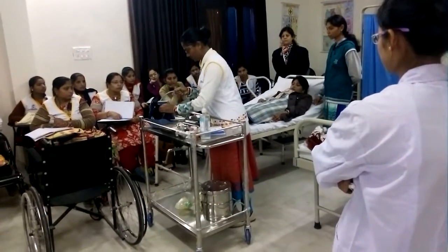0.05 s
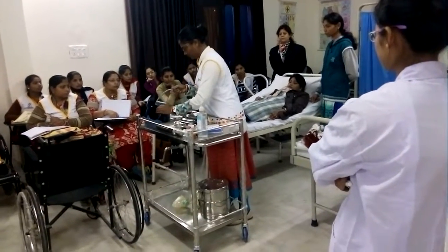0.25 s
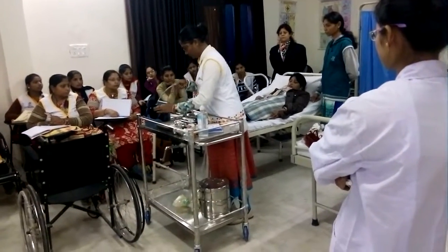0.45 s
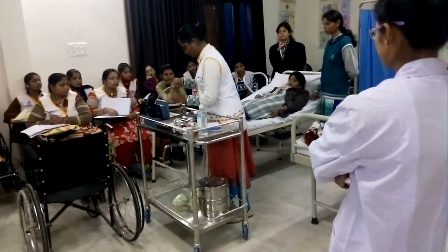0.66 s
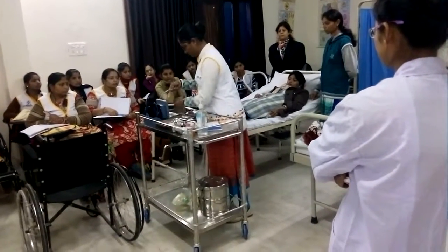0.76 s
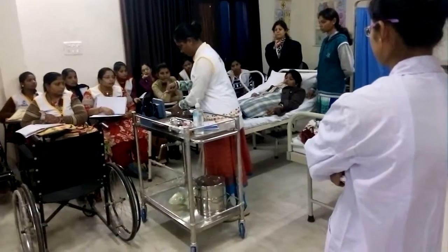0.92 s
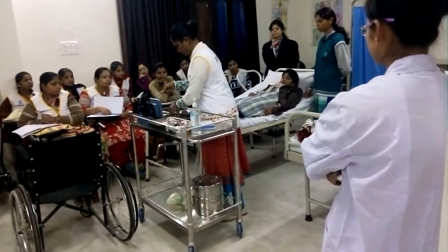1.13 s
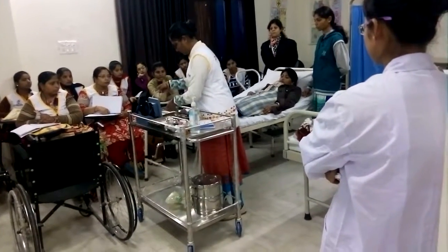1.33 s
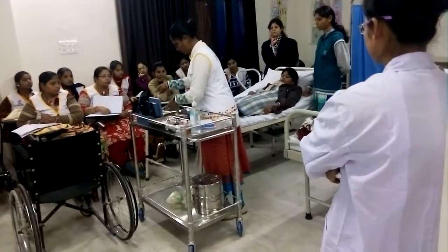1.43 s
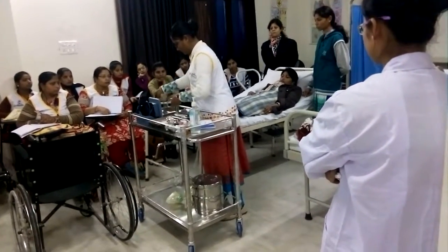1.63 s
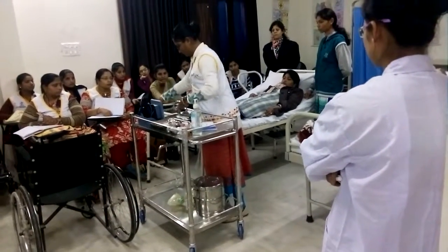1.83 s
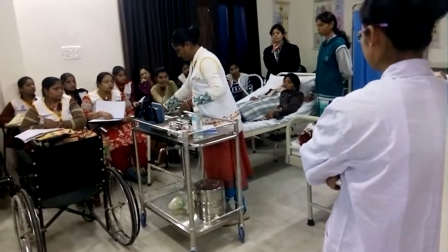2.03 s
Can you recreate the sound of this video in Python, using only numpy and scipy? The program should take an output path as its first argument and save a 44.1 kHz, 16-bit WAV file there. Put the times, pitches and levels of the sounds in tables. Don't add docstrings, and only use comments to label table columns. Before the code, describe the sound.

Steel trays and small instruments clatter on a trolley, already ringing at the start, then softer, briefly dragged and dropped with a sharp bright clank; low bumps and hiss, hard room, phone microphone a few metres away.

```python
import sys
import numpy as np
from scipy import signal
from scipy.io import wavfile
from scipy.ndimage import uniform_filter1d

SR = 44100
rng = np.random.default_rng(int(sys.argv[2]) if len(sys.argv) > 2 else 0)


def wrap_up_sound(samples):
    columns = np.atleast_2d(samples).T
    tamed = np.clip(columns, -1, 1)
    steps = np.round(tamed * 32767).astype(np.int16)
    wavfile.write(sys.argv[1], SR, steps)


def invert_db(level):
    return 10 ** (np.asarray(level, dtype=float) / 20)


N = 91772
LEAD = 4410


def evened(x):
    return x / np.sqrt(np.mean(x ** 2) + 1e-24)


def read(points, hz):
    f, value = np.transpose(points)
    return np.interp(np.log(hz + 1), np.log(f + 1), value)


def add(mix, start_s, sound):
    part = mix[LEAD + round(start_s * SR):][:len(sound)]
    part += sound[:len(part)]


def colour(x, points):
    gain_db = read(points, abs(np.fft.fftfreq(4096, 1 / SR)))
    log_gain = np.log(invert_db(np.maximum(gain_db, -100)))
    taps = np.fft.ifft(np.exp(np.conj(signal.hilbert(log_gain)))).real[:2048]
    return signal.oaconvolve(x, taps)[:len(x)]


def ring(x, hz, width_hz):
    r = np.exp(-np.pi * width_hz / SR)
    pole = r * np.exp(2j * np.pi * hz / SR)
    return 2 * signal.lfilter([1 - r], [1, -pole], x).real


def clicks(count, per_s, spread_db):
    when, sign, size = rng.random((count, 3)).T
    force = invert_db(spread_db * np.minimum(-np.log(size + 1e-9), 4))
    return (when < per_s / SR) * np.sign(sign - .5) * force


# pitch_hz, t60_s
ROOM = [(200, 0.95), (700, 0.85), (1500, 0.57), (3000, 0.37), (6500, 0.28)]


def room(x):
    taps = np.zeros(30000)
    at = np.arange(200, 29980, 20)
    taps[at + rng.integers(0, 20, len(at))] = rng.choice([-1., 1.], len(at))
    hz, t, z = signal.stft(taps, SR, nperseg=256)
    decay = invert_db(-60 * t / read(ROOM, hz)[:, None])
    tail = signal.istft(z * decay, SR, nperseg=256)[1]
    return signal.fftconvolve(x, tail / np.linalg.norm(tail))


# start_s, level_db, rise_s, hold_s, fall_t60_s
CLATTERS = [
    (-.03, -33.5, 0.0025, .11, 0.29),
    (0.29, -34.5, 0.0019, 0.016, 0.3),
    (0.524, -41, 0.0097, 0.043, 0.28),
    (1.058, -48, 0.0087, 0.09, 0.11),
    (1.259, -24, 0.0087, 0.006, 0.21),
    (1.441, -56, 0.011, 0.046, 0.1),
]
# pitch_hz, level_db_per_hz
COLOURS = [
    [(88, -64), (150, -14.5), (761, -7), (894, -3.5), (1120, -6), (1570, -3.5), (1900, -3.5), (5870, -7),
     (7000, -24), (9100, -60), (15400, -120)],
    [(88, -56), (150, -38.5), (309, -5), (363, -3), (773, -15.5), (1120, -12.5), (2990, -12.5),
     (5680, -23.5), (7000, -46.5), (9100, -89), (15400, -120)],
    [(88, -38), (150, -8), (304, -3), (953, -12.5), (1840, -9.5), (2270, -12), (3180, -8.5), (5770, -23.5),
     (7000, -38.5), (9100, -60.5), (15400, -120)],
    [(180, -40), (300, -11), (688, -12.5), (828, -9.5), (1440, -9.5), (5670, -4.5), (7000, -20.5),
     (9100, -54), (15400, -120)],
    [(300, -29.5), (900, -19.5), (1150, -12), (1700, -13.5), (1950, -8), (4300, -6), (5800, -14),
     (7000, -37.5), (9000, -73.5)],
]
# pitch_hz, level_db_per_hz
SCRAPE = [(400, -28), (900, -3.5), (2100, -4.5), (4400, 2.5), (5300, -8), (6300, -13), (7300, -28),
          (9000, -60)]
# pitch_hz, width_hz, level_db
RINGS = [
    [(1138, 90, 4), (1843, 60, 5), (2920, 70, 4), (4220, 50, 1), (4870, 50, 1.5), (5330, 120, 0)],
    [(312, 50, 0), (470, 60, -1), (793, 60, 1), (960, 84, 0.5), (2928, 300, 3), (3866, 400, -4)],
    [(283, 94, 4), (2150, 500, 8), (3310, 120, -7), (4510, 31, -20)],
]
# pitch_hz, width_hz, level_db
TRAY_RINGS = [
    [(1450, 400, -2.5), (4050, 300, 2.5)],
    [(1100, 300, -3), (2200, 900, 3), (4200, 1500, 2)],
]
# pitch_hz, width_hz, level_db
SCRAPE_RINGS = [(2050, 220, 0.5), (3900, 200, 4)]
# ring_over_rattle_db, collisions_per_s, room_db, gate_closes_s, gate_db
MAKE = [
    (-7, 6000, -7.5, .25, -2.5),
    (-0.5, 5000, -5.5, 0.099, -3),
    (-12, 2000, -8.5, 0.09, -4),
    (-9.5, 7100, -4.5, 0.11, 0.5),
    (-12, 3300, -3, 0.147, -3.5),
    (-17, 2600, -3.5, .12, -12),
]
GATE_S = .014
LOW_HZ, LOW_RISE_S, STEEL_ROOM_DB = 1600, 0.028, -4


def steel(x, rings):
    total = 0
    for k, (hz, width_hz, db) in enumerate(rings):
        total = total + (-1) ** k * invert_db(db) * ring(x, hz, 0.47 * width_hz) / np.sqrt(width_hz)
    return total


def clatter(row, tone, rings, make):
    start_s, db, rise_s, hold_s, fall_s = row
    ring_db, per_s, room_db, gate_s, gate_db = make
    t = np.arange(SR // 2) / SR
    shape = np.minimum(t / rise_s, 1) ** 2 * invert_db(-60 * np.maximum(t - rise_s - hold_s, 0) / fall_s)
    hits = clicks(len(t), per_s, spread_db=1.58)
    rattle = colour(shape * hits, tone) / colour(hits, tone).std()
    lows = signal.filtfilt(*signal.butter(2, LOW_HZ, fs=SR), rattle)
    rattle = rattle - lows * np.maximum(1 - t / LOW_RISE_S, 0)
    rung = invert_db(ring_db) * steel(shape * hits, rings) / steel(hits, rings).std()
    wet = invert_db(room_db) * room(rattle + invert_db(STEEL_ROOM_DB) * rung)
    wet[:len(t)] += rattle + rung
    gate = np.clip((np.arange(len(wet)) / SR - gate_s) / GATE_S, 0, 1)
    return start_s, invert_db(db + gate_db * gate) * wet


# time_s, level_db
BUMPING = [(0, -49.5), (.13, -48.5), (.26, -60), (.34, -50.5), (.42, -58.5), (.5, -50.5), (.6, -53),
           (.76, -59), (.86, -67.5), (.96, -55.5), (1.05, -65.5), (1.12, -54), (1.4, -53.5), (1.52, -62.5),
           (1.68, -61), (1.79, -60.5), (1.86, -63), (2.08, -65.5)]
# pitch_hz, level_db_per_hz
BUMP = [(24, -47.5), (40, -18), (185, -4.5), (225, -7), (310, -14), (1500, -27.5), (1950, -58),
        (3300, -120)]
# pitch_hz, width_hz, level_db
FRAME = [(108, 13, -6.5), (144, 22, -1.5), (226, 15, 0.5), (308, 23, 2.5)]
FRAME_DB = -8


def bumps():
    time_s, level_db = np.transpose(BUMPING)
    hits = clicks(N, 400, spread_db=1.5)
    knocks = evened(colour(hits, BUMP)) + 1.3 * evened(colour(rng.standard_normal(N), BUMP))
    hum = 0
    for hz, width_hz, db in FRAME:
        twice = ring(ring(hits, hz, width_hz), hz, 3 * width_hz)
        hum = hum + invert_db(db) * twice / np.sqrt(width_hz)
    level = invert_db(np.interp(np.arange(N) / SR, time_s, level_db) - 2)
    return level * evened(evened(knocks) + invert_db(FRAME_DB) * evened(hum))


# pitch_hz, level_db_per_hz
HISS = [(150, -22), (500, -7.5), (1000, -8), (3000, -10), (6200, -15), (7400, -29), (9000, -67.5)]
HISS_DB = -70.5
# time_s, offset_full_scale
DRIFT = [(0, -.0018), (.25, -.001), (.35, -.0014), (.75, -.0008), (1.04, -.00063), (1.36, -.0017),
         (1.46, -.001), (2.08, -.00047)]
HISS_FOLLOW = 0.76


def hiss():
    time_s, offset = np.transpose(DRIFT)
    lift = np.interp(np.arange(N) / SR, time_s, offset / offset[-1]) ** HISS_FOLLOW
    return invert_db(HISS_DB - 2) * lift * evened(colour(rng.standard_normal(N), HISS))


# start_s, peak_db, pitch_hz, rise_s, t60_s
PINGS = [(.292, -35, 964, .006, .22), (.292, -39, 770, .006, .25), (.318, -37, 312, .012, .15),
         (.338, -38.5, 312, .008, .15), (.347, -41, 452, .014, .1), (1.243, -33, 3900, .001, .025),
         (.485, -50, 290, .01, .1), (.32, -41, 1800, 0.0064, 0.093), (1.264, -21, 4700, .002, .035),
         (1.269, -22, 3900, .002, .025), (1.264, -29, 5750, .002, .03), (1.267, -28, 2150, .003, .04),
         (1.53, -64, 6130, .028, .04), (1.5, -62, 3750, 0.018, .05), (1.475, -59.5, 5000, .015, .15),
         (1.571, -52.5, 256, 0.0027, .04), (1.5, -54.5, 245, 0.0052, 0.074), (1.739, -53, 198, .003, .05),
         (1.5, -52, 193, .004, 0.052), (1.779, -50, 146, .004, 0.091), (1.5, -55, 200, .003, .05),
         (2, -55, 220, 0.0034, 0.049), (2.043, -55.5, 170, .003, .06), (1.375, -50.5, 300, .01, 0.085),
         (.555, -44, 320, .012, .15), (.595, -45, 250, .015, .12), (.06, -34, 1100, .006, .08),
         (.08, -36, 900, .006, .06), (.105, -37, 1140, .005, .06), (1.44, -54, 2050, .015, .2),
         (1.455, -54, 1100, .006, .08), (1.46, -56, 4010, .02, .2), (1.48, -58, 2760, .015, .15),
         (1.52, -60, 2140, .015, .15), (.99, -56, 150, .02, .15), (1.995, -56, 140, .005, .06),
         (1.875, -58.5, 300, .008, 0.071), (.795, -57, 3500, .001, 0.022), (1.202, -41, 4000, .002, .04)]


def ping(start_s, db, hz, rise_s, t60_s):
    t = np.arange(SR // 4) / SR
    swell = np.sin(np.pi / 2 * np.minimum(t / rise_s, 1)) ** 2
    fade = invert_db(db - 60 * np.maximum(t - rise_s, 0) / t60_s)
    return start_s, swell * fade * np.sin(2 * np.pi * hz * t)


# start_s, peak_db, pitch_hz, width_hz,
# length_s
TICKS = [(0.29, -48, 870, 300, 0.017), (0.5, -61, 2900, 900, 0.023), (.535, -37.5, 3840, 770, 0.0085),
         (.797, -64.5, 3300, 600, .035), (.94, -71.5, 3900, 150, .055), (1.032, -68.5, 3950, 200, 0.046),
         (1.06, -49, 3640, 1200, .008), (1.148, -40.5, 4200, 460, 0.038), (1.203, -40, 3900, 795, 0.011),
         (1.204, -51.5, 870, 550, 0.058), (1.196, -54.5, 5800, 500, 0.05), (1.2, -49, 2200, 1900, 0.099),
         (1.243, -43, 3950, 700, 0.022), (0.803, -62, 750, 420, 0.061), (0.8, -58.5, 227, 19, 0.11),
         (1.664, -66, 650, 400, 0.07), (1.476, -63, 5880, 900, 0.085), (1.264, -29.5, 5450, 510, 0.013),
         (.1, -51, 266, 64, 0.05), (1.148, -45, 5000, 1200, .003)]
TICK_ROOM_DB = -10


def tick(start_s, db, hz, width_hz, length_s):
    t = np.arange(SR // 3) / SR
    hits = clicks(len(t), 11000, spread_db=3.5)

    def body(x):
        return ring(ring(x, hz, width_hz), hz, 1.1 * width_hz)

    shape = np.exp(-(t / length_s) ** 3) * (1 + 0.71 * np.exp(-t / 0.00078))
    return start_s, invert_db(db - 3) * body(shape * hits) / body(hits).std()


DRAG_HZ = [840, 1141, 1445, 1640, 1842, 2301, 2625, 3105, 3762, 3878, 4095, 5532]
DRAG_LEVELS = [-56, -59.5, -59, -64, -59.5, -61.5, -58, -63.5, -65, -59, -64, -59]
DRAG_RISE_S, DRAG_FLUTTER = .03, .8


def drag():
    t = np.arange(SR // 5) / SR
    gate_s = MAKE[3][3]
    shape = np.minimum(t / DRAG_RISE_S, 1) * np.clip(1 - (t - gate_s) / GATE_S, 0, 1)
    modes = 0
    for hz, db in zip(DRAG_HZ, DRAG_LEVELS):
        wander = evened(uniform_filter1d(rng.standard_normal(len(t)), size=350))
        tone = np.sin(2 * np.pi * (hz * t + rng.random()))
        modes = modes + invert_db(db) * (1 + DRAG_FLUTTER * wander) * tone
    return CLATTERS[3][0], np.sqrt(2) * shape * modes


DROP_HZ = [2036, 2153, 2300, 2354, 2615, 2715, 2768, 3501, 3746, 3848, 4038, 4242, 4494, 4569]
DROP_LEVELS = [0, -2, -5, -3.5, -5.5, -2, -1.5, -4, -4.5, -9.5, -4, -3, -3.5, -2]
DROP_DB, DROP_T60_S = -31, 0.3


def drop():
    t = np.arange(SR // 2) / SR
    gate_s, gate_db = MAKE[4][3:]
    modes = 0
    for hz, db in zip(DROP_HZ, DROP_LEVELS):
        modes = modes + invert_db(db) * np.sin(2 * np.pi * (hz * t + rng.random()))
    gate = np.clip((t - gate_s) / GATE_S, 0, 1)
    fade = invert_db(DROP_DB - 60 * t / DROP_T60_S + 2 * gate_db * gate)
    return CLATTERS[4][0], fade * np.minimum(t / 0.005, 1) * modes


def scene():
    trays, tools = np.zeros(N + LEAD), np.zeros(N + LEAD)
    tones = COLOURS + [SCRAPE]
    rings = RINGS + TRAY_RINGS + [SCRAPE_RINGS]
    for parts in zip(CLATTERS, tones, rings, MAKE):
        add(trays, *clatter(*parts))
    add(trays, *drop())
    add(trays, *drag())
    for row in TICKS:
        add(tools, *tick(*row))
    for row in PINGS:
        add(tools, *ping(*row))
    tools = tools + invert_db(TICK_ROOM_DB) * room(tools)[:N + LEAD]
    return ((trays + tools)[LEAD:] + bumps() + hiss())[None]


def top_cut(x):
    return signal.sosfilt(signal.butter(12, 8950, fs=SR, output="sos"), x)


EDGE_HZ = 7415
PHONE_RATE_HZ, IMAGE_DB = 16000, -20
# low_hz, high_hz
IMAGE_HZ = [8300, 8800]


def record(dry):
    t = np.arange(N) / SR
    wide = np.pad(dry, ((0, 0), (100, 100)), "reflect")
    band = signal.firwin(201, EDGE_HZ, window=("kaiser", 11), fs=SR)[None]
    x = signal.oaconvolve(wide, band, "valid", axes=1)
    mirror = signal.firwin(301, IMAGE_HZ, pass_zero=False, window=("kaiser", 9), fs=SR)[None]
    flipped = x * np.cos(2 * np.pi * PHONE_RATE_HZ * t)
    x = x + invert_db(IMAGE_DB) * signal.oaconvolve(flipped, mirror, "same", axes=1)
    x = x + np.interp(t, *np.transpose(DRIFT)) + invert_db(-99) * rng.standard_normal(x.shape)
    return top_cut(x)


dry = scene()
out = record(dry)
wrap_up_sound(out)
```